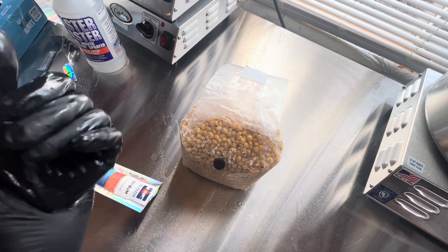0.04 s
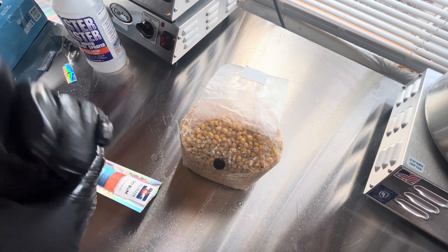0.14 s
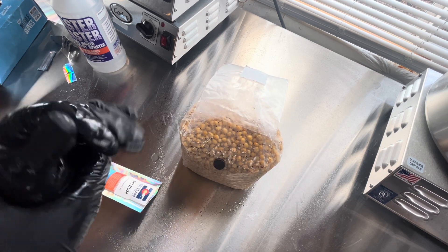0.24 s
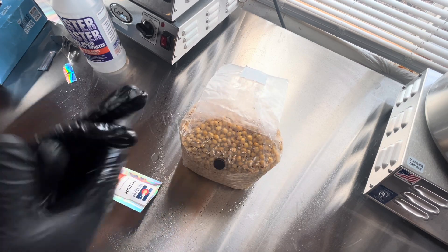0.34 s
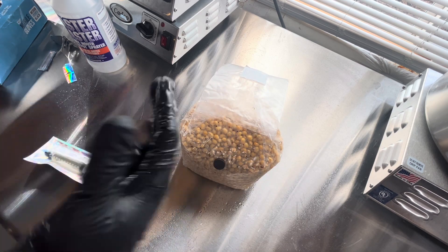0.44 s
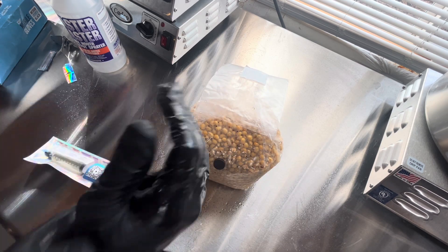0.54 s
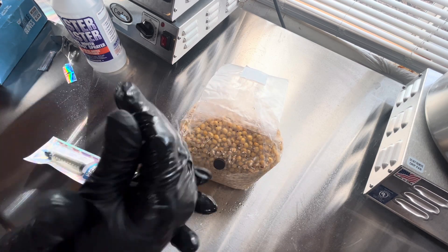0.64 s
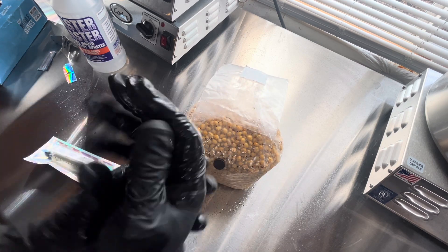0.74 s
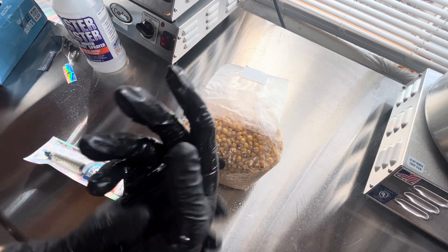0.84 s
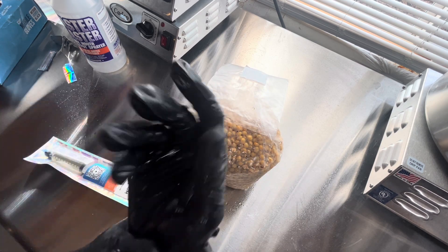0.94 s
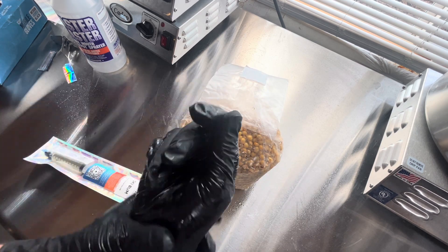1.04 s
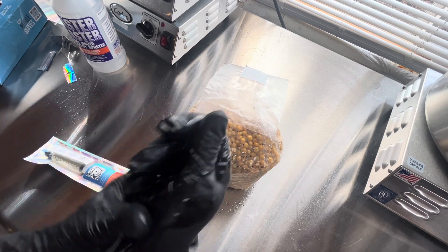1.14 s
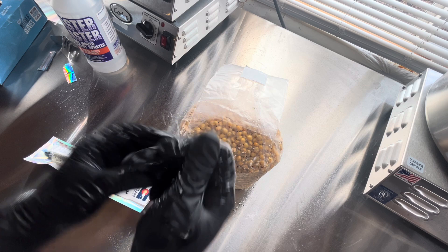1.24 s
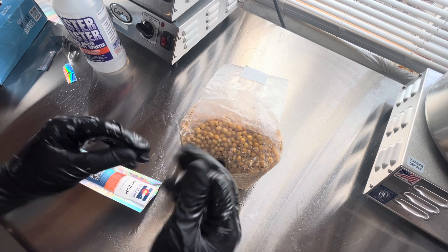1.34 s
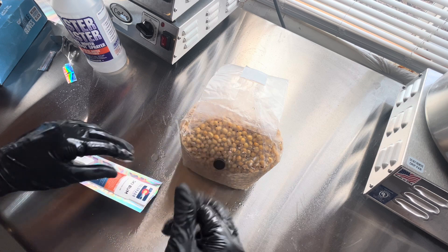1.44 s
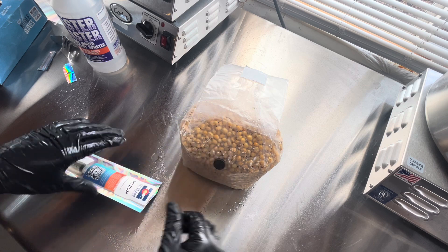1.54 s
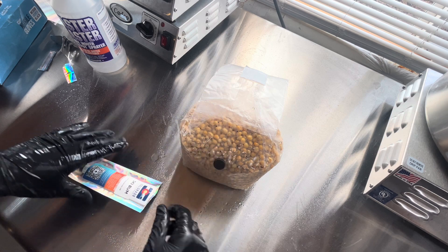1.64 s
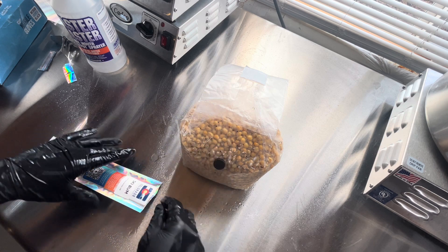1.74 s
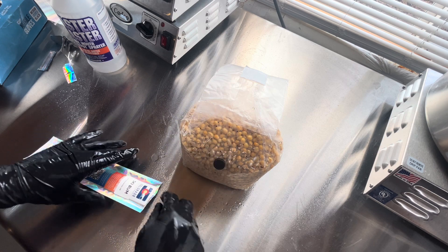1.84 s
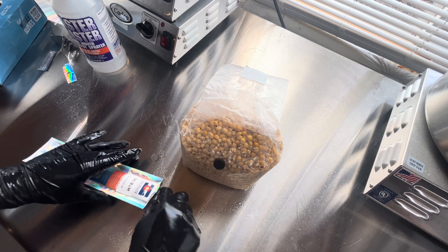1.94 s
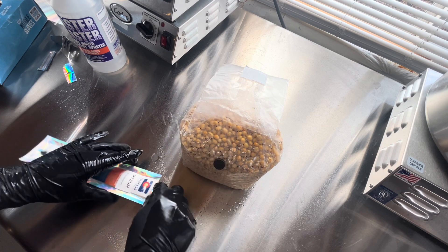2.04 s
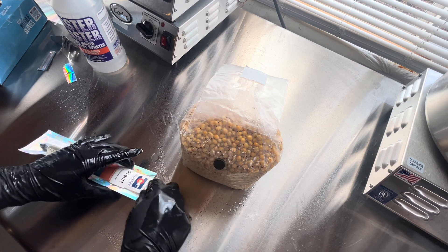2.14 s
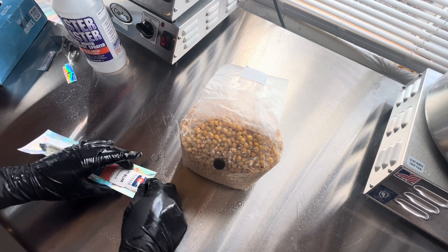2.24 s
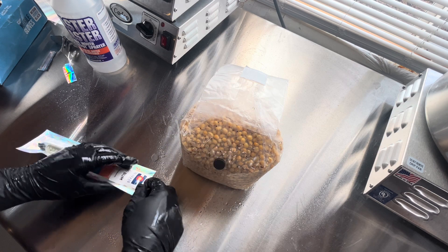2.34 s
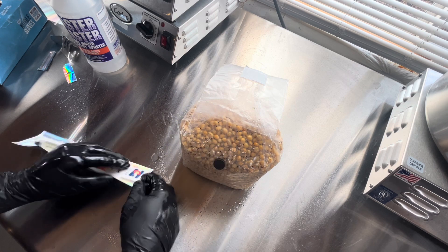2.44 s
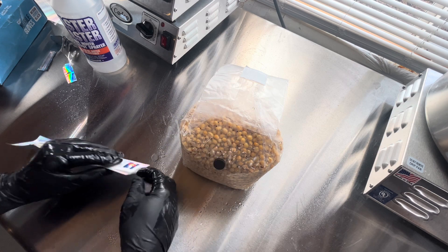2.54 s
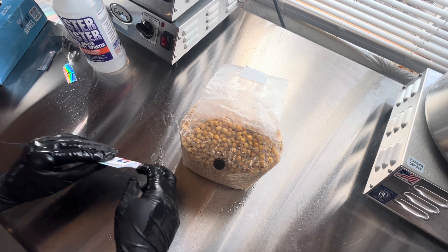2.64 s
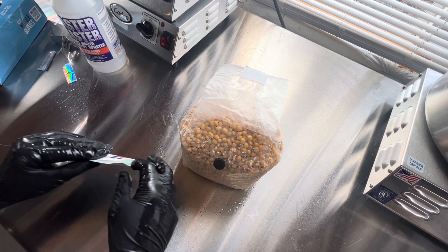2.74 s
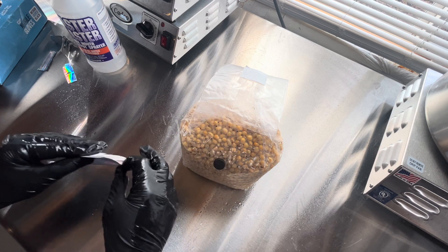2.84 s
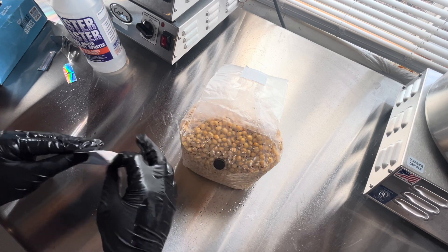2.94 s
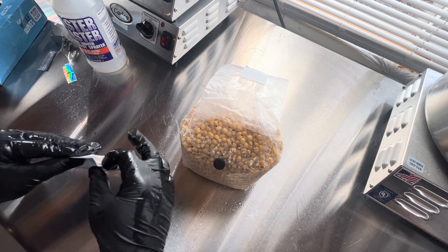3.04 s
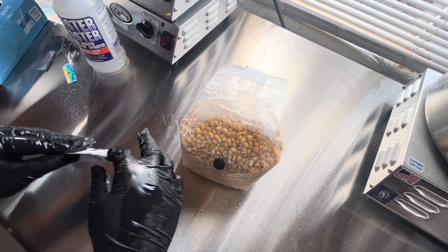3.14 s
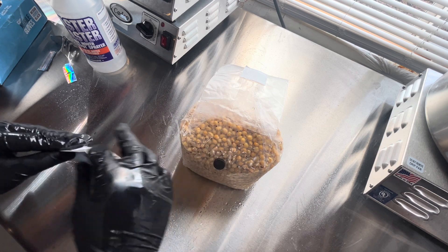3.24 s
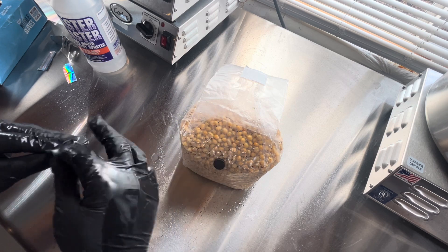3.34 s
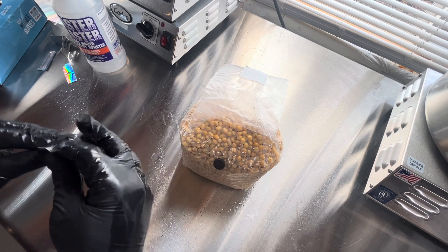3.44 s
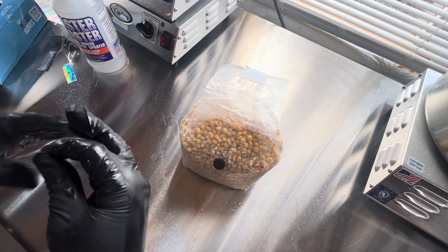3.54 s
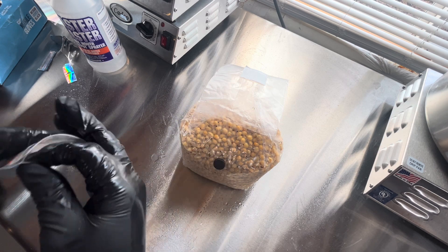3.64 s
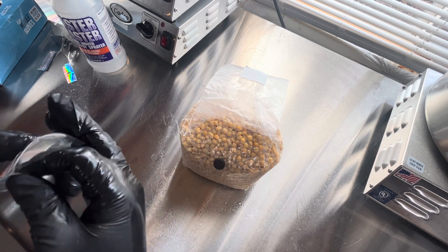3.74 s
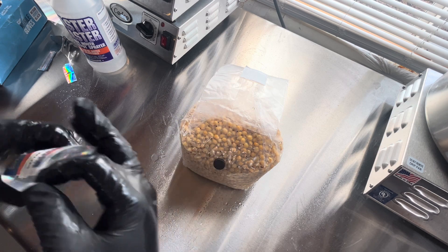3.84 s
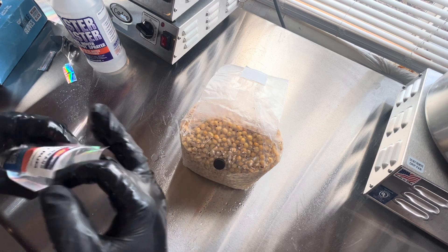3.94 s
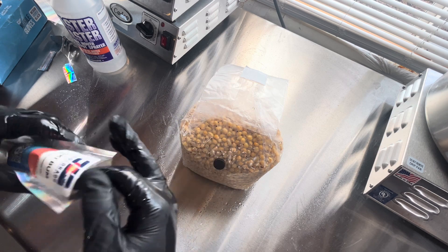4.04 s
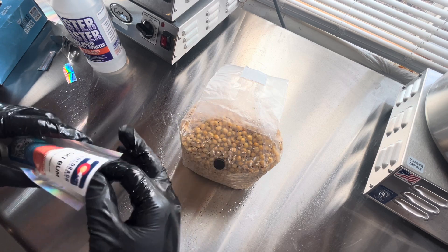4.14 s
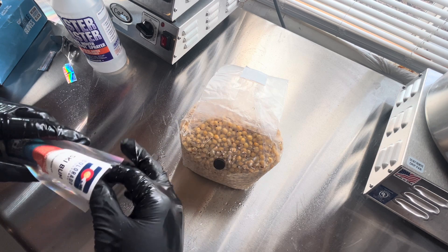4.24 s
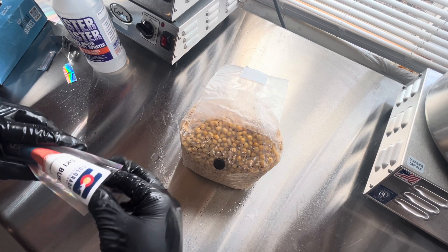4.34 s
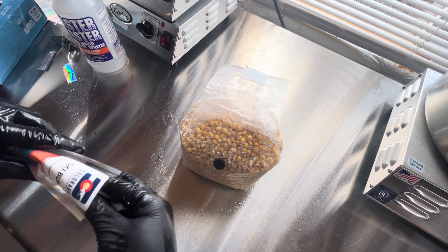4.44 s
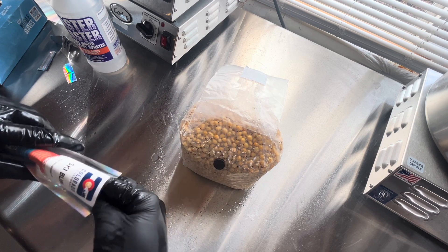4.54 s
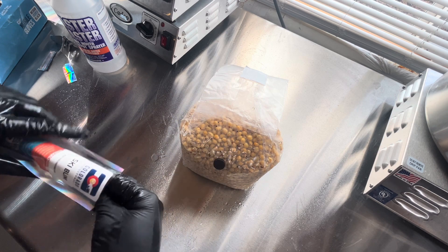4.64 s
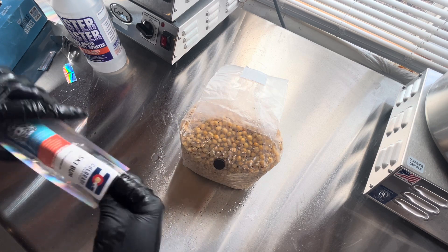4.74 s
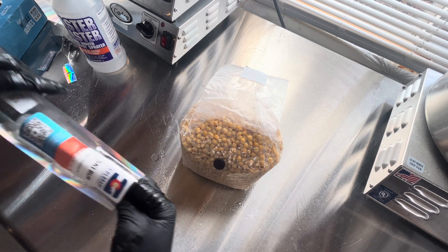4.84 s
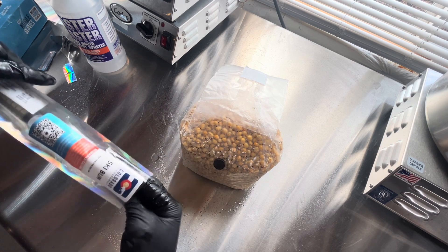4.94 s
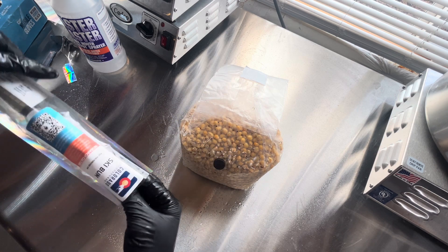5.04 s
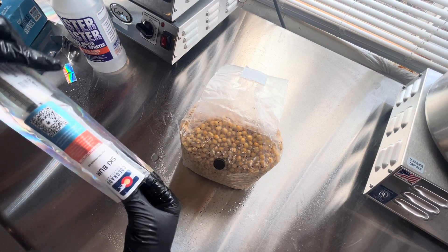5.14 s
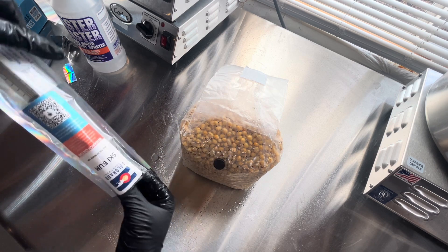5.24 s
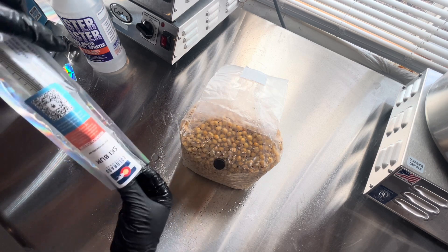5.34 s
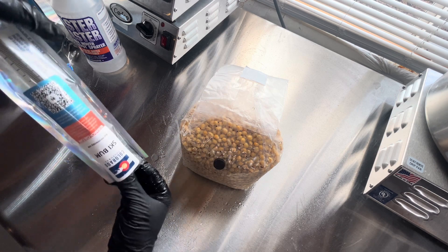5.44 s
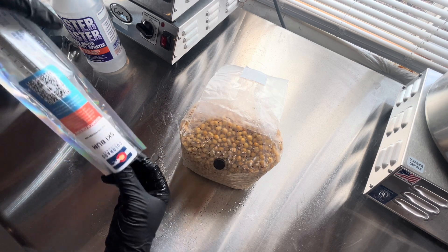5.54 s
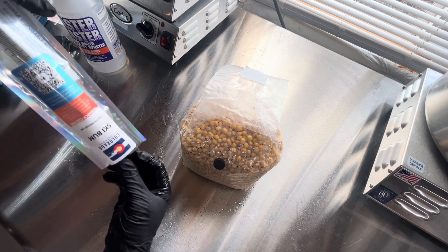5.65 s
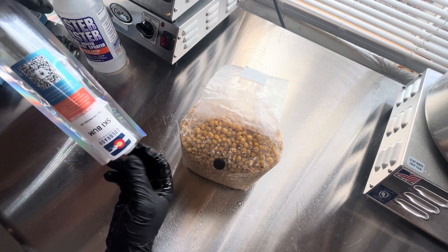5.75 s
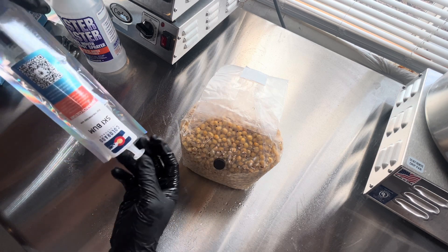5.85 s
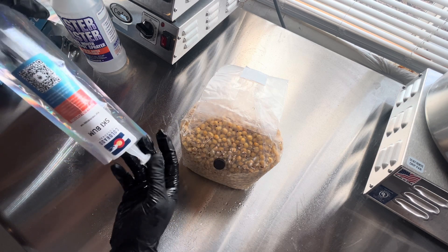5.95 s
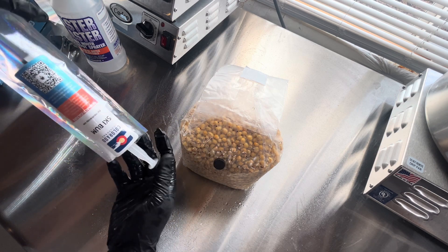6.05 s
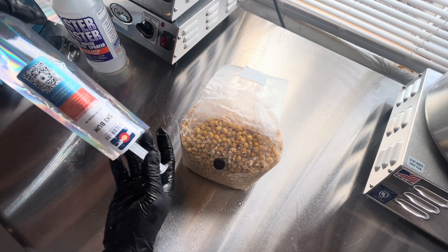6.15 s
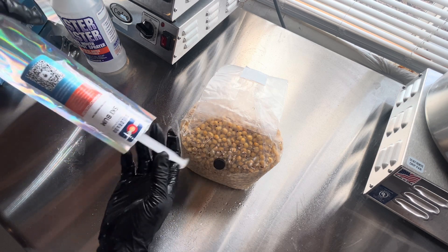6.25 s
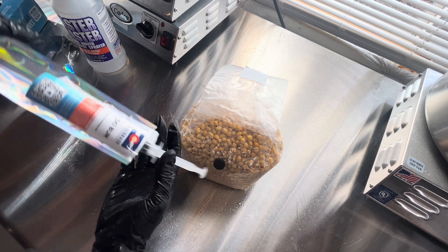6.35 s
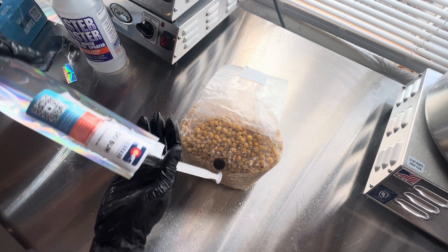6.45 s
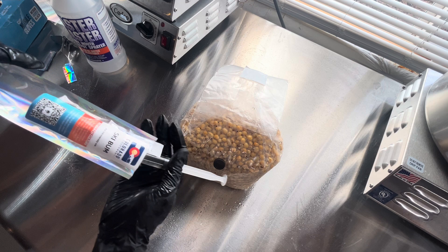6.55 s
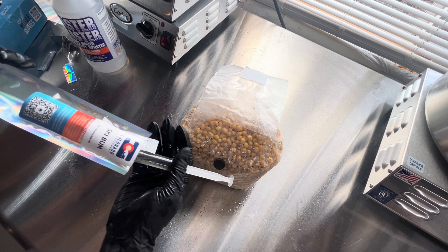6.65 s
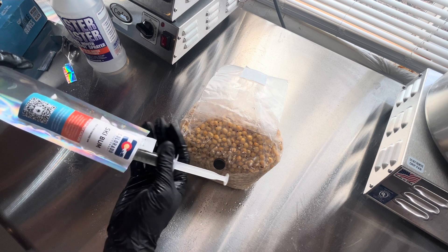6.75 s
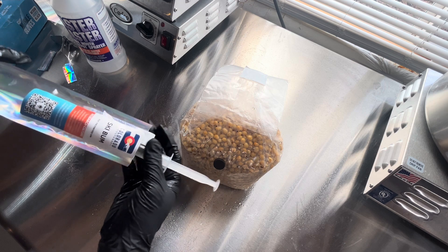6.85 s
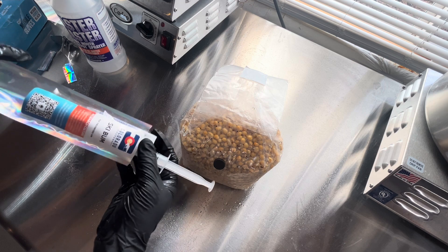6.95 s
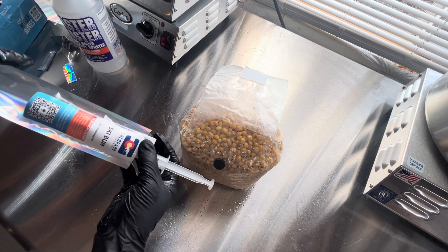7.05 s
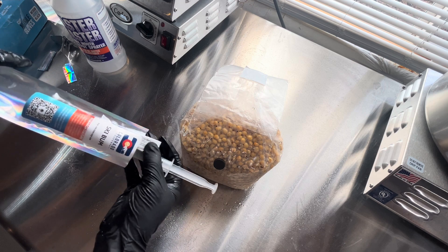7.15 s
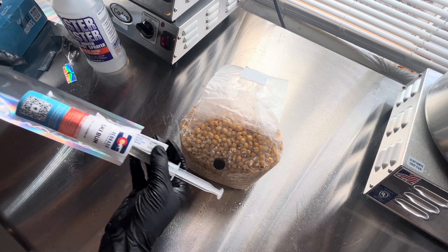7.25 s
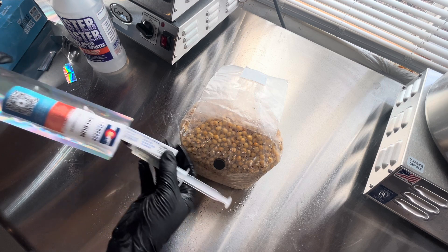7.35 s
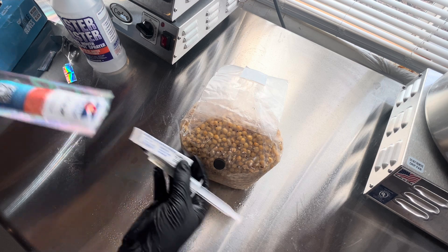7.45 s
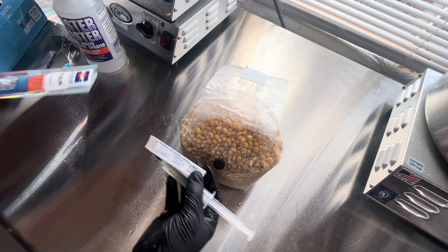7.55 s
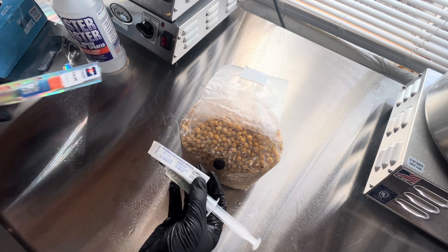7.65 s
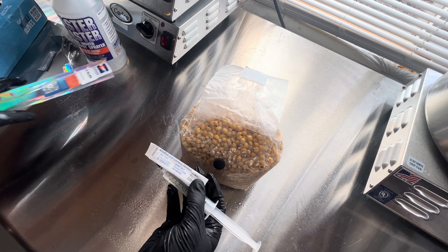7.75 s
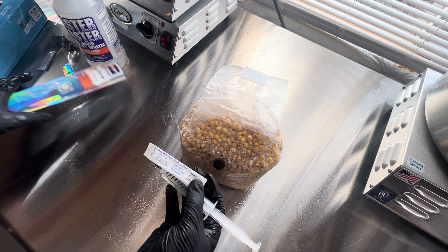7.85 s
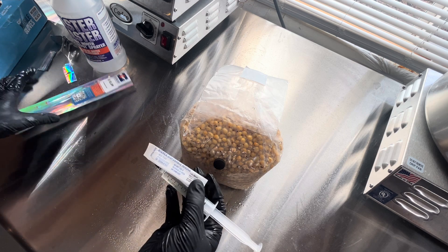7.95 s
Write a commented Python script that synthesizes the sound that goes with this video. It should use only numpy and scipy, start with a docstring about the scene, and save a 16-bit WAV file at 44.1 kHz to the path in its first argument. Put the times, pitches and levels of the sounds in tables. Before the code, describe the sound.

Rubber gloves rub together, then a plastic pouch crinkles and snaps as it is torn open and a syringe slides out.

```python
"""Gloved hands rub together up close, pick up a flat plastic pouch, tear it open and slide a syringe out.
Each hand movement is a swell of friction noise: smooth on rubber, grainy with tiny creases on film.
The film buckles in sharp snaps that ring its panels; a finger squeaks, a small hard part pings,
and hands and pouch bump softly. A fan rumbles faintly in the small room.
A phone's two microphone ports pick it all up."""
import sys
import numpy as np
from scipy import signal
from scipy.fft import rfft, irfft
from scipy.io import wavfile

SR = 44100
rng = np.random.default_rng(int(sys.argv[2]) if len(sys.argv) > 2 else 0)


def put_to_file(sound):
    """Save the sound as 16-bit audio at rate SR, in the file named by the first command-line argument."""
    columns = np.atleast_2d(sound).T  # one column per channel
    safe = np.clip(columns, -1, 1)
    whole_steps = np.round(safe * 32767)
    wavfile.write(sys.argv[1], SR, whole_steps.astype(np.int16))


N = 352359
HZ = np.arange(N // 2 + 1) * SR / N

# hand movements, each a swell: peak_s, rise_s, fade_s, level_db, brightness_db
HAND_MOVES = [(0.0, .1, 0.32, -59.5, 14.5), (.17, 0.28, 0.059, -57.5, 14.5), (.32, 0.069, 0.21, -52, 14.5),
              (.41, 0.44, 0.13, -50, 14), (.7, 0.22, 0.1, -51, 8.5), (.87, 0.14, 0.13, -50, 9),
              (.94, 0.19, 0.046, -50.5, 12.5), (1.1, 0.17, 0.47, -55.5, 10.5), (1.221, .12, 0.065, -48, 2),
              (1.29, 0.036, 0.087, -55.5, -6.5), (1.339, .1, .05, -63.5, 8), (1.44, 0.12, 0.086, -71, 8),
              (1.52, 0.055, 0.067, -75, -7), (1.578, 0.052, 0.046, -58.5, -1.5),
              (1.91, 0.032, 0.14, -60.5, -2), (2.02, 0.042, 0.093, -60, 6), (2.1, 0.11, 0.16, -59.5, 8.5),
              (2.22, .15, 0.081, -64, 3), (2.33, 0.017, 0.32, -56, 0), (2.47, 0.14, 0.48, -56.5, 25),
              (2.6, 0.62, 0.035, -61.5, -9), (2.82, 0.22, 0.12, -54, 0.5), (2.99, 0.093, 0.054, -58, -7.5),
              (3.13, 0.1, 0.024, -61.5, -10.5), (3.25, 0.042, 0.14, -51.5, -2.5),
              (3.32, 0.17, 0.063, -54, -8), (3.42, 0.062, 0.062, -52, -6), (3.59, 0.28, 0.14, -55.5, -2.5),
              (3.7, 0.1, 0.19, -52.5, -6.5), (3.87, 0.12, 0.076, -53, -3), (4.04, 0.17, 0.3, -54.5, -2),
              (4.24, 0.027, 0.23, -63.5, -3), (4.36, .1, .1, -69, 0), (4.46, 0.13, .1, -63, -7),
              (4.54, .1, 0.045, -63.5, -2), (4.64, 0.083, 0.9, -58, -7), (4.81, 0.17, 0.083, -48, 6),
              (4.89, 0.24, 0.022, -55.5, 13), (5.03, 0.044, 0.076, -53, 2), (5.14, 0.12, 0.082, -56, -3.5),
              (5.27, .3, .3, -77.5, -7), (5.43, 0.13, .12, -62.5, -7), (5.53, 0.11, 0.11, -68, -16),
              (5.63, 0.21, 0.12, -56.5, -2.5), (5.82, .12, 0.15, -56, -4.5), (6.0, .12, .12, -56.5, 0.5),
              (6.17, 1, 1, -64, 1), (6.32, 0.052, 0.022, -54, 0), (6.39, 0.12, 0.07, -53.5, 8),
              (6.65, 0.18, 0.056, -60, 2), (6.78, 0.066, 0.085, -57, 2), (6.86, .1, 0.037, -70, -3.5),
              (7.02, 0.17, 0.067, -85, -9), (7.16, 0.1, 0.44, -60, 4), (7.26, 0.14, 0.13, -55.5, 1),
              (7.34, 0.37, 0.15, -66.5, 20), (7.43, 0.35, 0.021, -58, 13), (7.57, 0.057, 0.18, -78.5, -8.5),
              (7.68, 0.068, 0.21, -75, 1), (7.84, 0.026, 0.066, -66, 0), (7.92, 0.061, 0.11, -62.5, 12),
              (7.98, 0.14, .1, -57, 4)]
# how friction, sheen, film body and low rubbing follow a movement: offset_db, brightness_share
LAYER_RESPONSE = [(-1.86, 0.38), (-6, 0.44), (-2.44, -0.51), (-6, -0.46)]
# rustle colour as the grip goes from gloves to pouch to syringe: time_s, sheen_db, low_rub_db
GRIP_COLOUR = [(0, 2, 7.5), (.6, 3, 1.5), (1.2, 0, -6), (1.6, 5, -9), (2.1, 0, 2.5), (2.6, -7.5, 3),
               (3.0, -4, 3), (3.3, 6.5, 5.5), (3.8, -8, -1), (4.3, -1.5, 6), (4.9, -1, 1), (5.4, -1, 7.5),
               (5.9, 0, 0.5), (6.2, 2.5, -9.5), (6.6, 2, 1), (7.0, -0.5, 0), (7.5, -2, 2), (7.99, -9, 3.5)]
# EQ of the four rustle layers: frequency_hz, level_db
FRICTION_EQ = [(1800, -21.5), (2800, -4.5), (4300, -2), (5800, 0.5), (7000, -4), (8500, -10.5)]
SHEEN_EQ = [(5500, -3), (7500, 1.5), (11000, 3), (15500, -6.5), (16000, -46)]
FILM_BODY_EQ = [(600, -29.5), (1000, -8.5), (1700, -1.5), (2600, -2.5), (4000, -5.5)]
LOW_RUB_EQ = [(170, -15), (290, -2.5), (500, -2.5), (800, -8.5), (1200, -8)]
# the film buckling: start_s, peak_db, panel_hz, sharpness_db, weight_db
BUCKLES = [(1.344, -46, 2570, -17, -12.5), (1.482, -53.5, 1780, -18, -19), (1.498, -48.5, 2590, -17, -20),
           (1.573, -47, 3530, -16, -25), (2.017, -48.5, 1310, -2, -8), (2.113, -47.5, 1030, -9, -9),
           (2.15, -29, 2420, -11.5, -18.5), (2.25, -48.5, 2610, -7, -14), (2.325, -45.5, 980, -17, -17),
           (2.343, -27, 2530, -27, -20), (2.35, -26, 2190, -17.5, -23), (2.392, -40.5, 2430, -14, -11),
           (2.427, -43.5, 3610, -9, -7.5), (2.461, -34, 2440, -11, -20), (2.512, -25, 3220, -8.5, -22),
           (2.551, -38.5, 3500, -9, -10.5), (2.578, -29.5, 3280, -35, -26), (2.601, -41.5, 947, -26, -13),
           (2.717, -20, 2760, -18.5, -24.5), (2.739, -45.5, 3780, -52, 2.5), (2.795, -17.5, 3630, -11, -20),
           (2.803, -25, 3910, -13, -33), (2.965, -44, 974, -10, -9), (2.987, -41.5, 977, -11.5, -7),
           (3.235, -46, 1610, -4, -29), (3.262, -32.5, 3580, -9.5, -8), (3.337, -36, 2430, -15, -13.5),
           (3.418, -32, 1030, -15, -10.5), (3.499, -20.5, 2520, -8.5, -25), (3.513, -27, 1980, -22, -29),
           (3.545, -41.5, 2160, -25, -6), (3.554, -42, 1950, -18, -18), (3.571, -27.5, 2290, -18.5, -28),
           (3.613, -35.5, 1980, -12.5, -17), (3.653, -25, 1370, -14.5, -23), (3.842, -22, 2370, -11, -21),
           (3.866, -33.5, 1990, -14, -19), (3.924, -33.5, 2360, -13.5, -14), (3.965, -26.5, 980, -8.5, -20),
           (3.977, -25.5, 2380, -4.5, -22.5), (3.988, -23.5, 2200, -7, -20.5),
           (3.995, -15.5, 1500, -9, -42), (4.056, -21.5, 1490, -10, -24.5), (4.245, -37.5, 1620, -13, -16),
           (4.317, -42.5, 1170, -15, -6), (4.35, -40, 1170, -13.5, -17.5), (4.394, -23.5, 1970, -13, -53),
           (4.437, -31.5, 1970, -16, -22.5), (4.608, -32, 999, -12.5, -19.5), (4.634, -39, 1920, -16, -24),
           (4.659, -31, 3950, -17.5, -32), (4.67, -25.5, 3000, -18.5, -29.5),
           (4.708, -34.5, 2130, -15.5, -25), (4.725, -36, 1730, -13, -16), (4.757, -25, 1120, -17, -26),
           (4.784, -19, 3620, -8, -14.5), (4.865, -36, 1970, -18.5, -23), (4.978, -19.5, 2270, -5, -21),
           (5.005, -19.5, 1990, -10, -16), (5.027, -29.5, 1900, -13.5, -7), (5.125, -42.5, 2190, -20, -21),
           (5.515, -46, 1990, -37, -8), (5.595, -46, 2760, -30, -14), (5.656, -37.5, 2100, -22, -15),
           (5.789, -34, 1020, -9.5, -19), (6.026, -39, 2400, -11, -23.5), (6.219, -46.5, 2290, -6, -18),
           (6.316, -40.5, 1180, -4, -5.5), (6.403, -47, 1070, -12, -6), (6.462, -49, 1390, -6.5, -8),
           (6.62, -49.5, 1360, -20, -23), (6.996, -64, 813, 1, 2.5), (7.074, -62, 3170, -1.5, -18),
           (7.269, -38.5, 1050, -6, -9.5), (7.324, -42, 1190, -15, -6), (7.353, -44, 877, -8, -3),
           (7.391, -50, 1200, -3, 0), (7.419, -38.5, 3510, -7.5, -17), (7.424, -48.5, 2070, -3.5, -18),
           (7.53, -50.5, 1790, -36, -8), (7.685, -57, 3350, -3.5, -28), (7.843, -49, 2140, -14, -3.5),
           (7.917, -41, 2150, -8, -19), (7.941, -54, 931, -5.5, 1), (7.969, -41.5, 2020, -5.5, -5)]
# EQ of a buckle's treble snap and of the crack above it: frequency_hz, level_db
SNAP_EQ = [(3000, -11.5), (4500, 2.5), (5800, 3.5), (7000, -2), (8500, -33.5)]
CRACK_EQ = [(5500, -7), (7500, 5), (11000, 6.5), (14000, 0.5), (16500, -15)]
# soft bumps of a hand or the pouch: start_s, peak_db
BUMPS = [(2.149, -46), (3.34, -43), (3.978, -44), (5.019, -61), (6.326, -41), (7.325, -52), (7.358, -44),
         (7.955, -43.5)]
# a finger squeaking along the film: time_s, pitch_hz, level_db
SQUEAK_CURVE = [(3.265, 389, -53), (3.287, 365, -47), (3.301, 426, -59), (3.329, 440, -47.5),
                (3.35, 425, -71)]
# the fan's level ride: time_s, level_db
FAN_LEVEL = [(0.0, -56.5), (2.11, -61.5), (2.49, -56.5), (4.47, -60.5), (4.94, -59.5), (5.27, -64),
             (5.74, -56), (6.01, -63), (7.48, -63.5), (7.72, -63.5), (7.99, -62.5)]
# EQ of the fan, the air noise and the room's reflections: frequency_hz, level_db
FAN_EQ = [(22, -40), (38, -6), (54, 0.5), (76, -5.5), (88, -2.5), (103, -13), (131, -3), (152, -2),
          (161, 2.5), (171, -3.5), (204, -6.5), (249, -12), (280, -16.5), (330, -28.5), (430, -51.5),
          (730, -120)]
AIR_EQ = [(330, 9.5), (600, -2.5), (1100, -13), (1700, 1.5), (2500, -10), (4500, -22), (8000, -2.5),
          (9500, -29.5), (13000, -14.5), (16000, -47.5)]
ROOM_EQ = [(200, -13.5), (700, -1.5), (1130, -2), (1400, -4.5), (1900, 0), (2600, -3), (5500, 2.5),
           (8000, -3), (15000, -10)]
# sound common to both microphone ports: frequency_hz, amplitude_share
PORT_SHARE = [(60, 0.91), (150, 0.97), (300, 0.6), (650, 0.17), (1100, 0.34), (1600, 0.65), (2300, 0.93),
              (3200, 0.072), (4500, 0.25), (6000, 0.72), (8000, 0.74), (10500, 0.74), (12500, 1),
              (14500, 0.23)]
# how far the left port leads the right: frequency_hz, phase_rad
LEFT_LEAD = [(0, 0), (1290, -0.6), (1980, 0.3), (2410, 0.8), (3270, 3.7), (3620, 6.5), (4310, 6.9),
             (5000, 9.4), (5600, 9.9), (6120, 9.6), (6890, 10.1), (8350, 12.2), (9560, 12.9), (11700, 15.3),
             (13500, 16.3), (14700, 18.5), (15500, 18.8), (16500, 18.7)]
# how much louder the left port is: frequency_hz, level_db
LEFT_BOOST = [(60, 1.5), (110, 1), (200, 1), (380, 2.5), (700, 2.5), (1290, 2), (2380, 1), (4400, 1.5),
              (8120, 0), (15000, 0)]


def rustle():
    """Four noise layers ride the same creases; wet rubber slides more smoothly than film."""
    friction_gain, sheen_gain, body_gain, low_gain = hand_movements()
    sheen_db, low_db = curves(GRIP_COLOUR)
    grain = creases(per_s=230, spread_db=2, t60_s=0.027, smooth=1.2) * from_db(1.3 * drift(8.3))
    on_gloves = np.arange(N) < 1.45 * SR
    grain = np.where(on_gloves, grain ** 0.55, grain)
    friction = friction_gain * patchy_noise(FRICTION_EQ, swing_db=2.2, rate_hz=6.1, bands=4)
    sheen = sheen_gain * patchy_noise(SHEEN_EQ, swing_db=2.2, rate_hz=14, bands=3)
    body = body_gain * patchy_noise(FILM_BODY_EQ, swing_db=2.2, rate_hz=6, bands=4)
    low_rub = low_gain * patchy_noise(LOW_RUB_EQ, swing_db=5.5, rate_hz=2.5, bands=3)
    return grain * (friction + from_db(sheen_db) * sheen + body + from_db(low_db) * low_rub)


def hand_movements():
    """Gain envelope of each rustle layer: the swells of all movements add in power."""
    peak_s, rise_s, fade_s, level_db, brightness_db = np.transpose(HAND_MOVES)[:, :, None]
    t = np.arange(0, N + 64, 64) / SR
    from_peak = np.where(t < peak_s, (peak_s - t) / rise_s, (t - peak_s) / fade_s)
    swell_db = level_db - 20 * from_peak ** 0.96   # 20 dB down one rise before and one fade after
    gains = []
    for offset_db, share in LAYER_RESPONSE:
        power = np.sum(from_db(swell_db + offset_db + share * brightness_db) ** 2, axis=0)
        gains.append(np.interp(np.arange(N) / SR, t, np.sqrt(power)))
    return gains


def creases(per_s, spread_db, t60_s, smooth):
    """Envelope of tiny creases of uneven size, each dying fast, over a smooth bed; rms 1."""
    triggers = rng.random(N) < per_s * from_db(4 * drift(9)) / SR
    sizes = triggers * from_db(-spread_db * np.minimum(rng.exponential(1, N), 4))
    grains = signal.lfilter([1], [1, -from_db(-60 / (t60_s * SR))], sizes + 1e-18)
    return unit_rms(smooth + unit_rms(grains))


def patchy_noise(eq, swing_db, rate_hz, bands):
    """Noise whose overlapping bands each come and go, as folds of film stiffen and slacken."""
    spectrum = rfft(coloured_noise(eq))
    low_hz, high_hz = eq[0][0], eq[-1][0]
    band_position = np.clip(np.log((HZ + 1) / low_hz) / np.log(high_hz / low_hz), 0, 1) * (bands - 1)
    out = np.zeros((2, N))
    for band in range(bands):
        crossfade = np.maximum(1 - np.abs(band_position - band), 0)
        out += from_db(swing_db * drift(rate_hz)) * irfft(spectrum * crossfade, N)
    return unit_rms(out)


def film_buckles():
    """Each buckle rings a panel, with a low push, a snap and a crack: the higher the layer, the shorter."""
    size = 4096
    t, out = np.arange(size) / SR, np.zeros((2, N + size))
    low, snap, crack = (np.tile(coloured_noise(eq), 2) for eq in (LOW_RUB_EQ, SNAP_EQ, CRACK_EQ))
    white = rng.standard_normal((2, N + size))
    for start_s, peak_db, panel_hz, sharpness_db, weight_db in BUCKLES:
        span = slice(round(start_s * SR), round(start_s * SR) + size)
        snap_db, crack_db = sharpness_db + 1, 2.1 * sharpness_db + 10.5   # the crack grows faster
        hit = panel_ring(white[:, span] * attack_decay(t, 0.00032, 0.021), panel_hz)
        hit += from_db(weight_db) * low[:, span] * attack_decay(t, 0.00052, 0.04)
        hit += from_db(snap_db) * snap[:, span] * attack_decay(t, 0.0001, 0.013)
        hit += from_db(crack_db) * crack[:, span] * attack_decay(t, 0.00029, 0.011)
        out[:, span] += from_db(peak_db) * hit
    return out[:, :N]


def panel_ring(burst, pitch_hz):
    """A soft panel of film: one broad resonance with the top rolled off; peak 1."""
    width_hz = 0.7 * pitch_hz
    radius, angle = np.exp(-np.pi * width_hz / SR), 2 * np.pi * pitch_hz / SR
    ring = signal.lfilter([1, 0, -1], [1, -2 * radius * np.cos(angle), radius ** 2], burst)
    ring = signal.sosfilt(signal.butter(2, 3.35 * pitch_hz, fs=SR, output="sos"), ring)
    return ring / np.abs(ring).max(axis=1, keepdims=True)


def soft_bumps():
    """Short low thuds whose pitch falls as the contact spreads."""
    size = 3000
    t, out = np.arange(size) / SR, np.zeros(N + size)
    pitch_hz = 70 + 190 * np.exp(-t / 0.0043)
    bump = np.sin(2 * np.pi * np.cumsum(pitch_hz) / SR) * attack_decay(t, 0.0014, 0.05)
    for start_s, peak_db in BUMPS:
        start = round(start_s * SR)
        out[start:start + size] += from_db(peak_db) * bump
    return out[:N]


def finger_squeak():
    """A finger sticks and slips on the film: a short wavering tone."""
    pitch_hz, level_db = curves(SQUEAK_CURVE)
    t = np.arange(N) / SR
    gate = np.clip(np.minimum(t - SQUEAK_CURVE[0][0], SQUEAK_CURVE[-1][0] - t) / 0.017, 0, 1)
    phase = 2 * np.pi * np.cumsum(pitch_hz) / SR
    tone = np.sqrt(2) * np.sin([phase, phase + np.pi / 2])
    return gate * from_db(level_db + 1.8 * drift(40)) * tone


def ping(start_s=7.531, pitch_hz=1820, peak_db=-57, t60_s=0.067):
    """One tap on a small stiff part, ringing in a single mode."""
    t = np.maximum(np.arange(N) / SR - start_s, 0)
    return from_db(peak_db - 60 * t / t60_s) * np.sin(2 * np.pi * pitch_hz * t)


def small_room(dry, wet_db=-10.5, t60_s=0.086):
    """Adds dense reflections off bench and walls: a short tail of coloured noise."""
    t = np.arange(SR // 2) / SR
    tail = coloured_noise(ROOM_EQ)[:, :len(t)] * attack_decay(t, 0.0044, t60_s)
    tail /= np.sqrt(np.sum(tail ** 2) / 2)
    return dry + from_db(wet_db) * signal.fftconvolve(dry, tail, axes=1)[:, :N]


def fan_and_air(air_db=-79.5):
    """Room tone: a wavering fan rumble over faint air noise."""
    fan_db, = curves(FAN_LEVEL)
    fan = from_db(fan_db + 1.6 * drift(1.15)) * coloured_noise(FAN_EQ)
    return fan + from_db(air_db) * coloured_noise(AIR_EQ)


def coloured_noise(eq):
    """Two independent noises with one EQ, rolled off beyond its ends; rms 1."""
    low_hz, high_hz = eq[0][0], eq[-1][0]
    roll_off = np.minimum((HZ / low_hz) ** 3, 1) * np.minimum((high_hz / (HZ + 1)) ** 6, 1)
    white = rfft(rng.standard_normal((2, N)))
    return unit_rms(irfft(white * from_db(over_frequency(eq)) * roll_off, N))


def drift(rate_hz):
    """Smooth random modulation; rms about 1."""
    hop, settle = 40, 2000
    pole = np.exp(-2 * np.pi * rate_hz * hop / SR)
    white = rng.standard_normal(N // hop + settle + 2)
    slow = signal.lfilter([1], [1, -2 * pole, pole ** 2], white)[settle:]
    return np.interp(np.arange(N) / hop, np.arange(len(slow)), unit_rms(slow))


def attack_decay(t, rise_s, t60_s):
    """Quick attack, exponential decay; peak 1."""
    shape = (1 - np.exp(-t / rise_s)) * from_db(-60 * t / t60_s)
    return shape / shape.max()


def curves(rows):
    """Each value column of an automation table at every sample."""
    time_s, *columns = np.transpose(rows)
    return [np.interp(np.arange(N) / SR, time_s, column) for column in columns]


def over_frequency(rows):
    """A frequency table on the HZ grid, joined by straight lines on a log axis."""
    frequency_hz, values = np.transpose(rows)
    return np.interp(np.log(HZ + 1), np.log(frequency_hz + 1), values)


def from_db(db):
    """Decibels to gain."""
    return 10 ** (np.asarray(db) / 20)


def unit_rms(x):
    """Scale to rms 1."""
    return x / np.sqrt(np.mean(x ** 2) + 1e-20)


def scene():
    """The mix at two ports: the left hears one channel, the right a phase-shifted blend of both."""
    handling = small_room(rustle() + film_buckles() + finger_squeak() + ping())
    left, other = rfft(handling + soft_bumps() + fan_and_air())
    share = over_frequency(PORT_SHARE)
    lead_rad = np.interp(HZ, *np.transpose(LEFT_LEAD))
    right = (share * left + np.sqrt(1 - share ** 2) * other) * np.exp(-1j * lead_rad)
    pan = from_db(over_frequency(LEFT_BOOST) / 2)
    return irfft(np.array([left * pan, right / pan]), N)


def record(dry):
    """A steep high cut, 80 dB down at 17 kHz."""
    return signal.sosfilt(signal.cheby2(22, 80, 17000, fs=SR, output="sos"), dry)


dry = scene()
out = record(dry)
put_to_file(out)
```